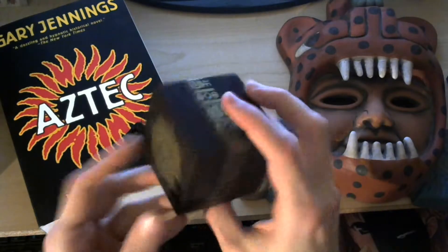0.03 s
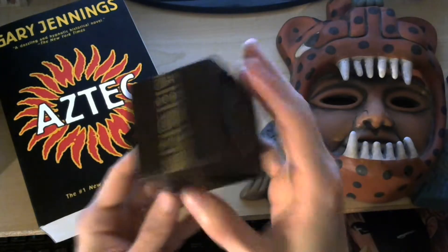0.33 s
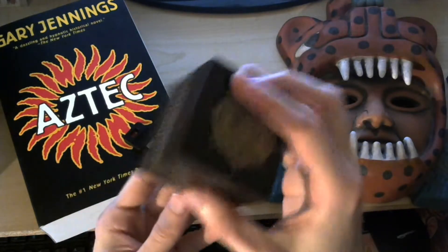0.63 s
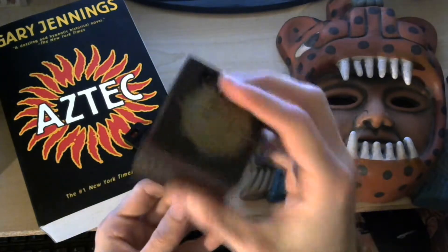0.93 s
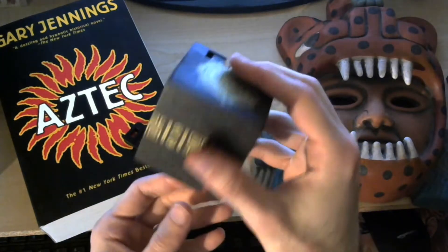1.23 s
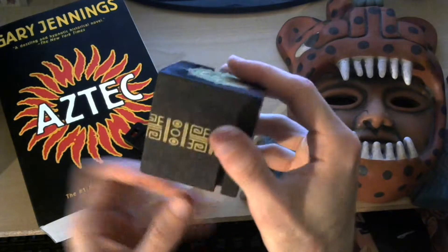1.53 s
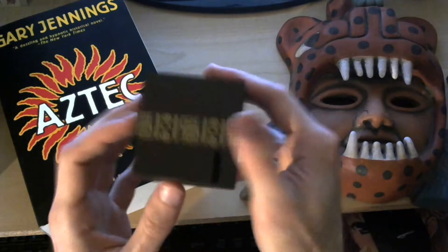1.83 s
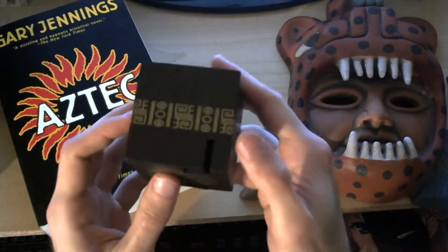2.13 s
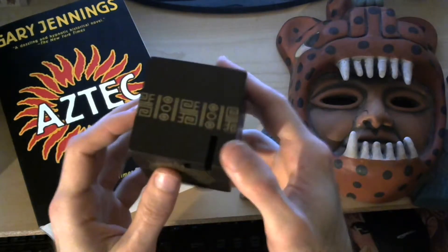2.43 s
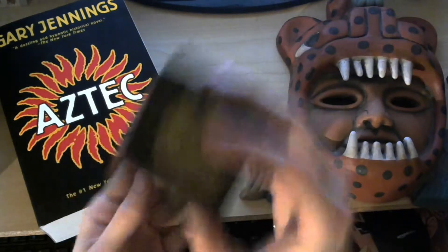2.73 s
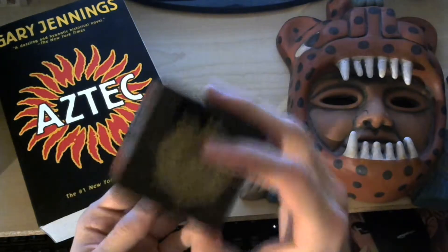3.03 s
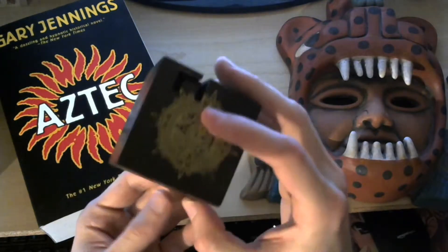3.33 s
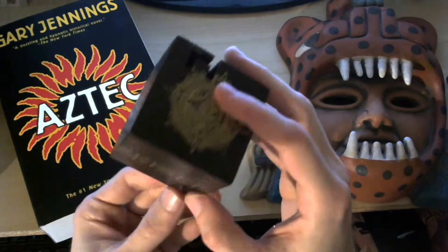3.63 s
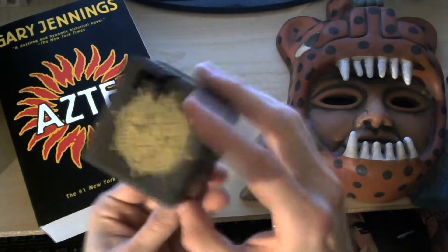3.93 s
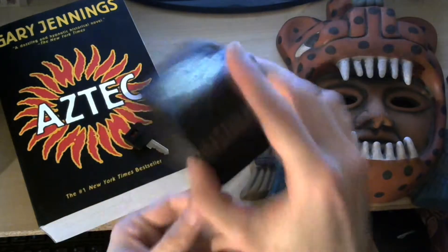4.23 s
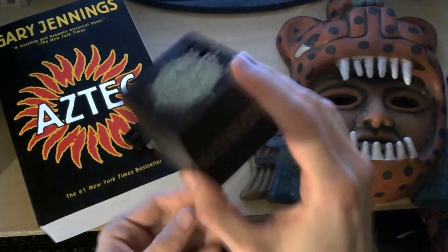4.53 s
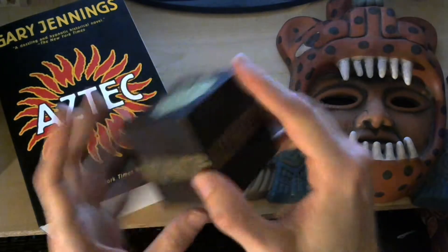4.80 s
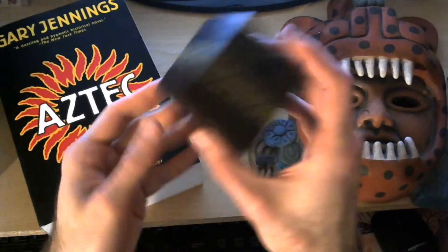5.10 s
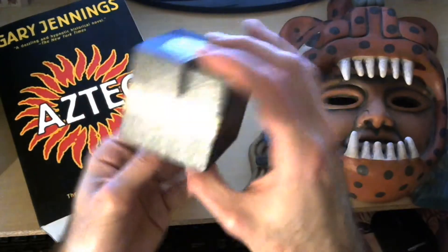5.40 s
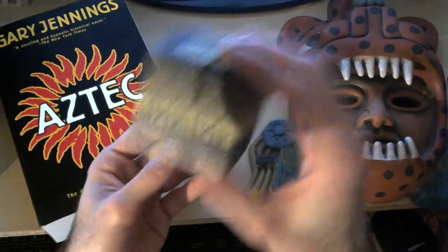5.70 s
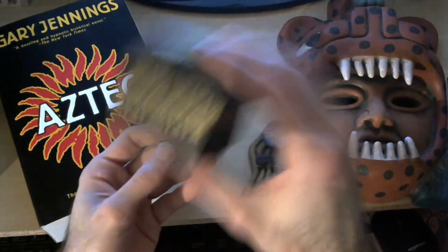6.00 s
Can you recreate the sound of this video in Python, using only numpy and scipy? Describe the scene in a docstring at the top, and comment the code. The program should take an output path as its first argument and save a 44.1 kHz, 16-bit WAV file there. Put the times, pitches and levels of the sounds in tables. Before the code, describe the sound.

A loose piece slides and clacks inside a small wooden box as hands turn and shake it in bursts.

```python
"""A soft rustle and a short slide, then sharp wooden clacks: hands tilt and shake a small puzzle box.
A loose piece scrapes along inside it, hits the walls and bounces. Each blow rings the walls,
the hollow inside and the piece itself. Fingers brush the wood, and hard shakes stir the air.
A few faint knocks sound dry. The desk and the small room echo the clacks, and the room rumbles faintly."""
import sys
import numpy as np
from scipy import signal
from scipy.fft import rfft, irfft
from scipy.io import wavfile

SR = 44100
rng = np.random.default_rng(int(sys.argv[2]) if len(sys.argv) > 2 else 0)


def dump(signal):
    """Clip the signal to [-1, 1] and save it as 16-bit WAV at the path in sys.argv[1]."""
    limited = np.clip(np.atleast_2d(signal).T, -1, 1)
    pcm = np.round(limited * 32767).astype(np.int16)
    wavfile.write(sys.argv[1], SR, pcm)


N = 267157

# The piece hits a wall. Each row: start in seconds, relative level of the walls in dB, then how many
# dB louder than the walls the hollow, the piece and the click are, and chatter time in seconds.
WALL_HITS = [ (0.1611, -59.5, -32, 7.5, -5.5, 0.0049), (0.186, -58, -12, -6.5, -6, 0.0023),
             (0.2105, -27, -13.5, -1.5, -15.5, 0.0028), (0.2181, -30, -23, -13, -7, 0.00059),
             (0.2346, -42.5, 10.5, -23, -3, 0.00081), (0.2394, -35, -6, -6, -26, 0.0035),
             (0.7172, -46.5, -2.5, 3.5, -6.5, 0.00058), (0.7514, -35.5, -3, -11, -17.5, 0.00044),
             (0.7596, -46, 6.5, 0, -11, 0.00027), (0.7736, -38, -7, -3.5, -9.5, 0.0024),
             (0.838, -39.5, 0.5, 8.5, 4, 0.00069), (0.889, -31.5, -4, -11, -5, 0.0023),
             (0.902, -46.5, -2, -18, -3, 0.00079), (0.9117, -41, -17, -7, -11, 0.00067),
             (1.9216, -29.5, -6.5, 4, -3.5, 0.0016), (1.9624, -32, -9.5, -13.5, -3, 0.0026),
             (1.9791, -43, -11.5, 2.5, -15, 0.00095), (2.5535, -48.5, -15.5, -22, -17, 0.006),
             (2.6336, -34.5, 3, -2.5, -4, 0.0021), (2.6576, -37.5, -1.5, -5.5, -6.5, 0.0021),
             (2.7158, -34.5, -2.5, 11.5, 0.5, 0.0036), (2.7356, -44.5, -5, -19, -17, 0.0014),
             (2.776, -40, -2, 7.5, 1, .0004), (2.7857, -20, -12.5, -5.5, -4, 0.0019),
             (2.8114, -47, -5.5, -16, -24, 0.00076), (2.8556, -36.5, -9.5, 6, -7.5, 0.00025),
             (2.9142, -40.5, -4.5, -2, -5, 0.00096), (2.9369, -37, -3, -2.5, -1, 0.0038),
             (2.945, -42.5, 6, 3.5, 3, 0.0019), (2.981, -50.5, -1, 2, -14, 0.0014),
             (3.0544, -32, -12.5, -11, -6, 0.0023), (3.0694, -34.5, -13, -6.5, -10.5, .004),
             (4.049, -46.5, -5, -6.5, -11, 0.0039), (4.0671, -42.5, -11.5, -4, -9.5, 0.0023),
             (4.1496, -33.5, -10, -2, -13.5, 0.0028), (4.1597, -46, -9, -20, -3, 0.0075),
             (4.2796, -42.5, -8.5, -18, -10.5, 0.0031), (4.3151, -43, -10, -4, -10, 0.00093),
             (4.3384, -48, -1.5, -5, -15, 0.001), (4.3821, -40.5, -11.5, -2.5, -10.5, 0.0021),
             (4.425, -36.5, -9.5, -11, -15.5, 0.0016), (4.4805, -47, -5.5, 1, -22, 0.0014),
             (4.494, -39.5, -17, -14, -21, 0.0026), (4.5055, -47, -26, 3, -10.5, 0.0046),
             (4.663, -47, -12.5, -2.5, -19, 0.0017), (5.2813, -33.5, -3, -7.5, -10.5, 0.0014),
             (5.3182, -45, -6.5, -6, -11, 0.0011), (5.8086, -48, 0, -4, -2, 0.0012),
             (5.8165, -34, -7, -1, -10.5, 0.003), (5.845, -46.5, -8, 6, -4.5, .0004),
             (5.8789, -34.5, 2.5, 0, -1, 0.0013), (5.947, -35, -10.5, -16, -9.5, 0.00077),
             (5.983, -48.5, -3, -2, -22, 0.003)]
# The piece slides. Each row: start and end in seconds, relative level at the end in dB,
# and how many dB louder than the walls the piece rings.
PIECE_SLIDES = [(0.053, 0.204, -57, 0.5), (1.67, 1.868, -62.5, -14), (1.832, 1.915, -46.5, -8),
                (2.621, 2.87, -43, -2), (2.88, 3.0, -43.5, 4.5), (4.016, 4.166, -64, 11),
                (4.254, 4.495, -56.5, 4), (4.577, 4.718, -69.5, 2.5), (4.871, 4.91, -58.5, 1.5),
                (5.161, 5.285, -50, -8.5), (5.745, 5.854, -47, 1.5), (5.91, 6.016, -41.5, -1)]
# Fingers shift their grip. Each row: firmest moment in seconds, relative level in dB,
# rise time and fall time in seconds.
FINGER_RUBS = [(0.111, -69.5, 0.46, .14), (1.73, -70.5, 0.17, 0.04), (1.89, -57.5, 0.097, 0.29),
               (2.37, -77.5, .12, 0.18), (2.576, -60, .06, 0.03), (2.84, -50, 0.22, 0.18),
               (3.5, -77.5, .16, .3), (3.99, -62, 0.035, 0.057), (4.12, -62, 0.15, 0.3),
               (4.37, -58, 0.16, 0.15), (4.89, -66, .04, 0.026), (5.24, -60.5, .15, 0.23),
               (5.762, -55, 0.019, 0.24), (5.97, -58, 0.27, 0.086)]
# Faint, dry little knocks on the box. Each row: start in seconds, relative level in dB.
DRY_KNOCKS = [(0.373, -59), (0.405, -62.5), (0.591, -77.5), (1.5092, -69.5), (1.661, -77.5), (2.5207, -72),
              (2.5798, -65), (4.8792, -49.5)]
# Hard shakes. Each row: hardest moment in seconds, level in dB, rise time and fall time in seconds.
HARD_SHAKES = [(2.8, -63, .45, .6), (5.9, -72, .3, 0.24)]

# The tones that each part rings with. A wider tone dies away sooner.
# Each row: pitch in Hz, width in Hz, relative level in dB.
THUD_TONES = [(89, 200, -5), (199, 110, -0.5), (440, 210, -2)]   # the whole box
WALL_TONES = [(1525, 180, -6), (1614, 110, -4.5), (1750, 108, -1.5), (1929, 100, -3)]
PIECE_TONES = [(2220, 180, 5), (2333, 220, -2.5), (2480, 220, -10.5), (2580, 590, -9.5)]
CLICK_TONES = [(3480, 270, 6), (4420, 250, -9.5), (4460, 670, -7), (5160, 220, 0), (5550, 350, -4),
               (6370, 470, -12.5)]   # the wood's bright click
TICK_TONES = [(7020, 1200, -3), (8380, 210, 1.5), (9300, 330, -6.5), (10470, 820, -4.5),
              (12200, 2700, -12.5), (14500, 960, -19)]   # its even higher tick
WALL_SCRAPE_TONES = [(584, 60, -10.5), (1765, 50, 1), (3250, 510, -16), (5140, 830, -30.5)]   # the box during a slide
PIECE_SCRAPE_TONES = [(2235, 55, 1.5), (2430, 160, -11.5)]   # the piece during a slide
# The air in the hollow. Each row: multiple of the hollow's pitch, width in Hz, relative level in dB.
HOLLOW_TONES = [(1.0, 34.26, 1.5), (1.079, 91.2, -2), (1.2, 110.2, -2.5), (1.45, 262.7, -10.5)]
# Fingers over the box's slot tune the hollow. Each row: time in seconds, pitch in Hz.
HOLLOW_TUNING = [(0.2, 659), (0.9, 639), (2.8, 685.6), (4.2, 709.5), (4.9, 680), (5.29, 568.4), (5.82, 661)]

# A sound's colour is its mix of low and high. Each row: frequency in Hz, relative level in dB.
SKIN_COLOUR = [(60, -13.5), (250, -1.5), (520, -5.5), (670, -0.5), (950, -3), (1200, -7), (1650, -1),
               (2300, -3.5), (3000, -10.5), (4800, -8.5), (7000, -12.5), (10500, -18), (16000, -33.5)]   # skin on wood
AIR_COLOUR = [(12, -1.5), (40, -2), (70, -7.5), (140, -20), (400, -43), (2000, -79.5)]   # air pushed by the box
ECHO_COLOUR = [(100, -4.5), (400, -1), (650, 3), (900, -4), (1300, 2), (1900, -2), (2400, 0), (3400, 0),
               (5500, 0), (9000, 0.5), (16000, -3)]   # the room's echoes
RUMBLE_COLOUR = [(8, 17), (16, 11.5), (28, -0.5), (60, -8.5), (125, -7.5), (250, -6.5), (500, -14.5),
                 (1000, -22), (2000, -29.5), (4000, -34), (8000, -37), (16000, -35.5)]   # the room's rumble
# How long the room rings. Each row: frequency in Hz, seconds to fade by 60 dB.
ECHO_FADES = [(150, 0.32), (650, 0.4831), (2000, 0.4), (5000, 0.4128), (9000, 0.36), (16000, 0.22)]


def rattle(bounce_s=0.05, bounce_loss_db=27):
    """The loose piece hits the walls, and each hit is followed by a faint bounce at an uneven delay."""
    out = np.zeros(N)
    delays = bounce_s * rng.uniform(0.56, 1.3, len(WALL_HITS))
    for (s, level_db, *character), delay in zip(WALL_HITS, delays):
        add(out, s, blow(s, level_db, *character))
        bounce = blow(s, level_db - bounce_loss_db, hollow_db=-3, piece_db=-6.5, click_db=-8, chatter_s=0.04)
        add(out, s + delay, bounce)
    return out


def blow(s, level_db, hollow_db, piece_db, click_db, chatter_s):
    """One knock on the box. How hard it is and what it rings decide how dull or bright it sounds."""
    effort_db = level_db + 37.5   # 0 for a medium blow
    swing = sum(np.interp(s, [peak - rise, peak, peak + fall], [0, 1, 0])
                for peak, _, rise, fall in HARD_SHAKES)
    # Harder blows are brighter: less thud, more tick. Ringing the piece makes them rounder.
    thud_db = -10.5 - 0.32 * effort_db + 0.27 * piece_db
    tick_db = click_db - 10.5 + 0.34 * max(effort_db, -10) - 0.35 * max(piece_db, 0)
    # A flat blow pushes hollow and box together. Swinging the box into the piece adds thud too.
    thud_db += 0.26 * hollow_db + 2.5 * swing
    hollow_hz = np.interp(s, *np.transpose(HOLLOW_TUNING))
    hollow_hz *= 1 + 0.035 * rng.standard_normal()   # a little different each time
    parts = ringing_parts(chatter_s, hollow_hz)
    balance_db = [thud_db, hollow_db, 0, piece_db, click_db, tick_db]
    knock = sum(from_db(level_db + db) * unit_energy(part) for part, db in zip(parts, balance_db))
    return np.sqrt(0.01 * SR) * knock   # levels count as if the energy were spread over 0.01 seconds


def ringing_parts(chatter_s, hollow_hz):
    """The six sounds in a knock. Heavy parts feel mostly the first push, light parts every small touch."""
    push = contact(chatter_s, first_db=5.0)
    force = contact(chatter_s, first_db=-3.5)
    grit = contact(chatter_s, first_db=-14.0)
    hollow_tones = [(hollow_hz * multiple, width, db) for multiple, width, db in HOLLOW_TONES]
    thud = keep_band(resonate(push, THUD_TONES), hz=537, kind="low", order=3)
    hollow = keep_band(resonate(push, hollow_tones), hz=1630, kind="low")
    walls = keep_band(resonate(force, WALL_TONES), hz=1045.6, kind="high")
    piece = keep_band(resonate(force, PIECE_TONES), hz=1430, kind="high")
    click = keep_band(resonate(grit, CLICK_TONES), hz=2879, kind="high", order=3)
    click = keep_band(click, hz=7100, kind="low", order=3)
    tick = keep_band(resonate(grit, TICK_TONES), hz=6650, kind="high", order=3)
    return thud, hollow, walls, piece, click, tick


def contact(chatter_s, first_db, touches_per_s=9000):
    """A first touch, then chatter: a quick flurry of small touches as the piece settles on the wall."""
    length = int(0.09 * SR)
    age = np.arange(length) / SR / chatter_s
    touches = rng.standard_normal(length) * (rng.random(length) < touches_per_s / SR)
    force = unit_energy(touches * np.sqrt(age) * np.exp(-age))
    force[0] += from_db(first_db)
    return force


def resonate(force, tones):
    """A push sets tones ringing. Their pitch and strength stray a little, as no two blows land alike."""
    out = 0
    for k, (hz, width, db) in enumerate(tones):
        detune, stray_db = rng.normal(0, [0.005, 1.0])
        decay = np.exp(-np.pi * width / SR)
        angle = 2 * np.pi * hz * (1 + detune) / SR
        gain = (-1) ** k * from_db(db + stray_db) * (1 - decay ** 2) / 2
        feedback = [1, -2 * decay * np.cos(angle), decay ** 2]
        out = out + gain * signal.lfilter([1, 0, -1], feedback, force)
    return out


def sliding():
    """The sliding piece keeps catching on the wood, which rings both the walls and the piece."""
    strokes = [(from_db(db) * stroke(start, end), piece_db) for start, end, db, piece_db in PIECE_SLIDES]
    wall_gain = sum(gain for gain, _ in strokes)
    piece_gain = sum(gain * from_db(piece_db) for gain, piece_db in strokes)
    catches = friction(grain_db=6.0, slip_db=3.5)
    walls = wall_gain * unit_energy(resonate(catches, WALL_SCRAPE_TONES))
    piece = piece_gain * unit_energy(resonate(catches, PIECE_SCRAPE_TONES))
    return np.sqrt(N / 2) * (walls + piece)


def stroke(start_s, end_s, speed_power=0.61, stop_s=0.0072):
    """A slide grows louder as the piece speeds up, then dies quickly when it is stopped."""
    t = np.arange(N) / SR
    speed = np.clip((t - start_s) / (end_s - start_s), 0, 1)
    return speed ** speed_power * np.exp(-np.maximum(t - end_s, 0) / stop_s)


def friction(grain_db, slip_db, slips_per_s=110):
    """Rubbing is countless tiny catches, bunched together by sticking and slipping."""
    slips = np.interp(np.arange(N) / SR * slips_per_s, np.arange(N), rng.standard_normal(N))
    return rng.standard_normal(N) * from_db(grain_db * rng.standard_normal(N) + slip_db * slips)


def finger_rubs():
    """Skin brushing over wood makes a broad, soft rustle."""
    return swells(FINGER_RUBS) * coloured(friction(grain_db=-0.5, slip_db=4.0), SKIN_COLOUR)


def dry_knocks():
    """Faint, dry little knocks on the box, with no room echo."""
    out = np.zeros(N)
    for s, level_db in DRY_KNOCKS:
        add(out, s, blow(s, level_db, hollow_db=-18.5, piece_db=-1.5, click_db=-8, chatter_s=0.0001))
    return out


def stirred_air():
    """The swinging box pushes the air into a faint, deep flutter."""
    return swells(HARD_SHAKES) * coloured(rng.standard_normal(N), AIR_COLOUR)


def room_echoes(x, first_s=0.004, early_s=0.053):
    """Many echoes blend together, strongest at first from the desk and other things nearby."""
    t = np.arange(int(0.7 * SR)) / SR
    hz = np.fft.rfftfreq(len(t), 1 / SR)
    spectrum = rfft(rng.standard_normal(len(t))) * from_db(at_hz(ECHO_COLOUR, hz))
    echoes = 0
    for centre, fade_s in ECHO_FADES:
        band = at_hz([(f, f == centre) for f, _ in ECHO_FADES], hz)
        echoes = echoes + irfft(spectrum * band, len(t)) * from_db(-60 * t / fade_s)
    echoes *= (t > first_s) * (1 + np.exp(-t / early_s))
    return signal.fftconvolve(x, unit_energy(echoes))[:N]


def room_rumble(level_db=-67.5):
    """The room's low, steady background noise."""
    return from_db(level_db) * coloured(rng.standard_normal(N), RUMBLE_COLOUR)


def swells(moves, range_db=23):
    """Each hand movement grows by range_db over its rise time and fades as much over its fall time."""
    gain = 0
    for peak_s, level_db, rise_s, fall_s in moves:
        t = np.arange(N) / SR - peak_s
        gain = gain + from_db(level_db - range_db * np.maximum(-t / rise_s, t / fall_s))
    return gain


def coloured(noise, colour):
    """Give a noise its mix of low and high, at an average power of 1."""
    gains = from_db(at_hz(colour, np.fft.rfftfreq(N, 1 / SR)))
    return np.sqrt(N) * unit_energy(irfft(rfft(noise) * gains, N))


def keep_band(x, hz, kind, order=2):
    """Keep the "low" or the "high" side of hz and soften the rest."""
    return signal.sosfilt(signal.butter(order, hz, kind, fs=SR, output="sos"), x)


def at_hz(points, hz):
    """Read between a table's rows, giving every octave equal room."""
    f, value = np.transpose(points)
    return np.interp(np.log(np.maximum(hz, 1)), np.log(f), value)


def add(track, s, sound):
    """Mix a sound into a track at s seconds."""
    start = int(s * SR)
    track[start:start + len(sound)] += sound[:N - start]


def from_db(db):
    """Turn decibels into a number to multiply by."""
    return 10 ** (np.asarray(db) / 20)


def unit_energy(x):
    """Scale a sound so that its squared samples add up to 1."""
    return x / np.sqrt(np.sum(x ** 2) + 1e-20)


def scene(clack_db=-1.5, knock_db=-0.5, room_db=-9.0, slide_db=-7.0, finger_db=-3.5, rub_room_db=-7.0):
    """Mix the box, the fingers and the room into one channel. Only clacks and rubbing get echoes."""
    rumble = room_rumble()
    rubbing = from_db(slide_db) * sliding() + from_db(finger_db) * finger_rubs()
    clacks = from_db(clack_db) * rattle()
    echoes = from_db(room_db) * room_echoes(clacks + from_db(rub_room_db) * rubbing)
    knocks = from_db(knock_db) * dry_knocks()
    return (clacks + knocks + rubbing + echoes + stirred_air() + rumble)[None]


def record(dry, cutoff_hz=16100):
    """Cut away the very highest treble."""
    return signal.sosfilt(signal.ellip(10, 0.1, 80, cutoff_hz, fs=SR, output="sos"), dry)


dry = scene()
out = record(dry)
dump(out)
```